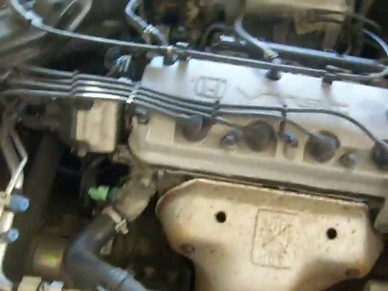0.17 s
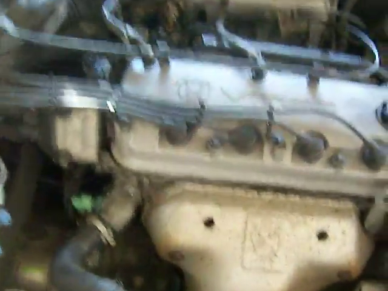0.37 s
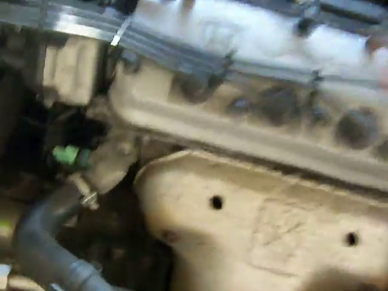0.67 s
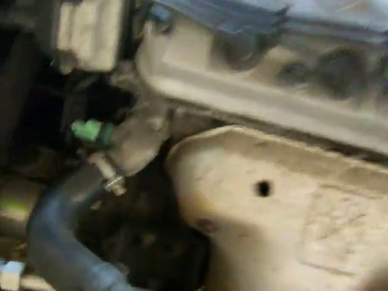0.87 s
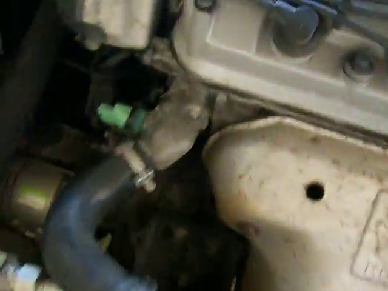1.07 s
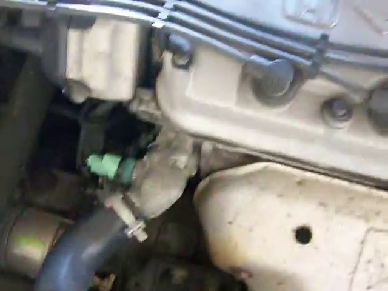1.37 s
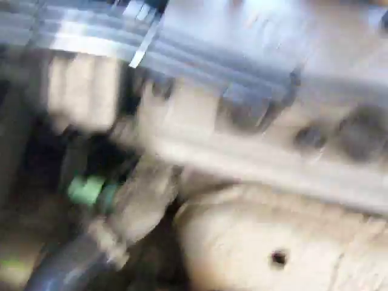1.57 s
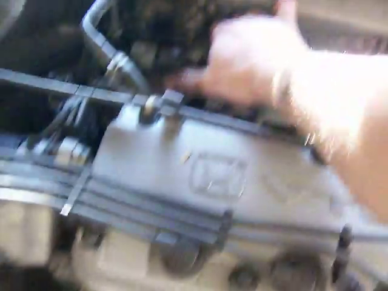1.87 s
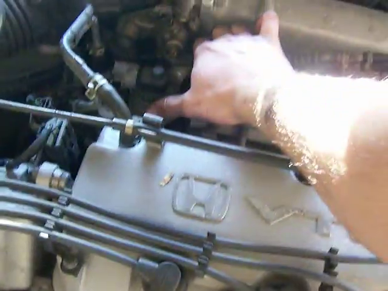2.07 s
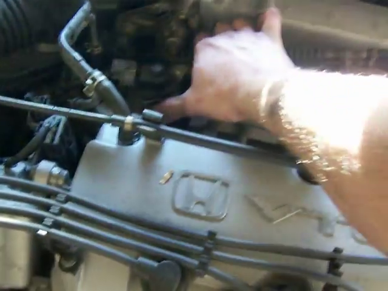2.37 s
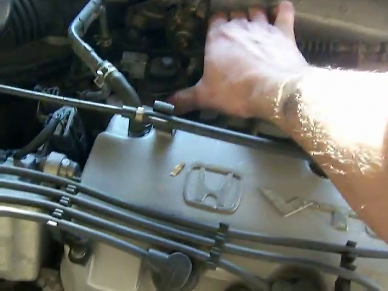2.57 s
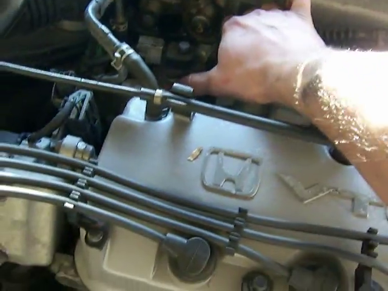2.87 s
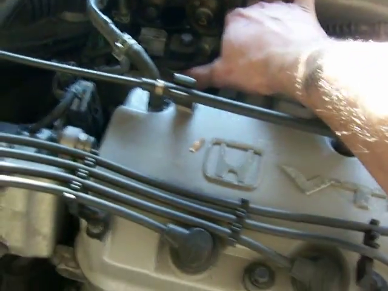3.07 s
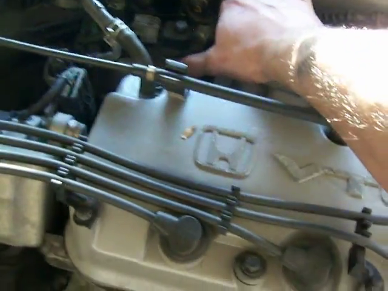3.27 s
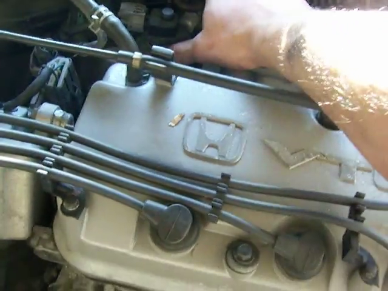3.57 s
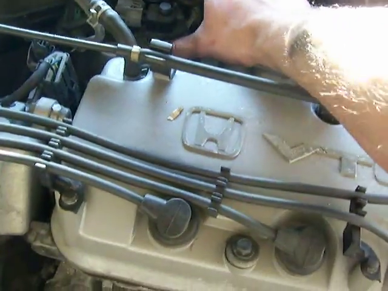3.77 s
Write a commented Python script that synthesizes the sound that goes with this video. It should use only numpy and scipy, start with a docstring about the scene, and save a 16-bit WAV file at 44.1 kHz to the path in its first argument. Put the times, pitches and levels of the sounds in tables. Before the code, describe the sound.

A car engine runs at a fast, steady idle, heard close over the open bay: a low throbbing drone, airy belt hiss, a faint wavering whine and metallic valve ticks about twelve a second. Around 2.6 s the throttle is blipped with a short growl; pitch climbs until about 2.9 s, then sinks, thinner and quieter with separate soft thumps, until a second blip begins near 3.85 s. Dull, limited treble.

```python
"""Fast-idling engine with throttle blips

A four-cylinder engine is heard close over the open bay. A hand blips the throttle: the revs rise and
sink back, and a second blip begins. Firings ring resonances of the intake and exhaust, over steady tones.
Clicks ring the valve gear, filtered noise makes belts, air, panels and roar, and an accessory whines."""
import sys
import numpy as np
from scipy import signal
from scipy.io import wavfile
from scipy.ndimage import uniform_filter1d

SR = 44100
rng = np.random.default_rng(int(sys.argv[2]) if len(sys.argv) > 2 else 0)


def int16_out(signal):
    """Quantize to a 16-bit WAV file."""
    q = np.round(np.clip(np.atleast_2d(signal).T, -1, 1) * 32767)
    wavfile.write(sys.argv[1], SR, q.astype(np.int16))


def voltage_ratio(level):
    """Linear amplitude factor for a level in decibels (scalar or array-like)."""
    return 10 ** (np.asarray(level, float) / 20)


N = 172431

# How strongly each exhaust part sounds: t/s, then level/dB of the unevenly fed low pipes,
# the evenly fed pipe, the firing tone, the upper pipes, and the beat once a crank turn
LOAD_LEVELS = [(0, -19.5, -23, -23, -28, -49), (.5, -21.5, -25.5, -24, -31, -55),
               (1, -19.5, -26, -25.5, -33, -45.5), (2.4, -19.5, -24.5, -25.5, -32, -51.5),
               (2.58, -17, -23.5, -26, -32.5, -39), (2.65, -15, -19, -33, -31, -44),
               (2.73, -26, -27, -26, -30, -23), (2.78, -32, -40, -33, -32.5, -35.5),
               (2.84, -31, -26, -27, -33, -40), (2.95, -36, -24, -30, -40.5, -38),
               (3.07, -38, -34, -26, -44, -40), (3.18, -43, -34.5, -34.5, -51, -47),
               (3.36, -37, -52, -29.5, -44, -35), (3.46, -37, -28, -29.5, -48, -31.5),
               (3.62, -52, -43, -32, -51, -29), (3.72, -45, -47, -35, -53, -41),
               (3.83, -19.5, -34.5, -36, -38.5, -41), (3.9, -18.5, -32, -25, -32.5, -25)]
# Noise of the engine bay: t/s, hiss level/dB (trimmed in bay_noise), intake roar level/dB
BAY_LEVELS = [(0, -30.5, -44.5), (1.87, -32.5, -46), (2.45, -31, -44.5), (2.6, -34, -42.5),
              (2.66, -38.5, -37.5), (2.72, -41, -48), (2.8, -38.5, -34), (2.9, -37.5, -46),
              (3.18, -37, -47), (3.5, -39, -51), (3.82, -40.5, -54), (3.9, -39, -35.5)]


def curve(table, col=1):
    """Join one table column by straight lines in time."""
    a = np.array(table, float)
    return np.interp(np.arange(N) / SR, a[:, 0], a[:, col])


def unit(x):
    """Scale to an rms of 1."""
    return x / np.sqrt(np.mean(x ** 2))


def band(x, hz, width):
    """Ring a two-pole resonance with a gain of 1 at its centre."""
    return signal.lfilter(*signal.iirpeak(min(hz, .45 * SR), hz / width, fs=SR), x)


def noise_band(hz, width):
    """Make noise at rms 1, narrowed by two passes through a resonance."""
    noise = rng.standard_normal(N)
    return unit(band(band(noise, hz, width), hz, width))


def walk(rate):
    """Wander at random: levels held for 1 / rate seconds, then smoothed twice."""
    hold = int(SR / rate)
    steps = np.repeat(rng.standard_normal(N // hold + 1), hold)
    return 1.12 * uniform_filter1d(uniform_filter1d(steps, hold), hold)[:N]


def strokes(cycle, sizes, scatter_db):
    """Give one click each quarter cycle, sized by cylinder and by chance."""
    quarter = np.floor(4 * cycle).astype(int)
    at = np.flatnonzero(np.diff(quarter)) + 1
    chance = voltage_ratio(scatter_db * rng.standard_normal(400)[:len(at)])
    out = np.zeros(N)
    out[at] = np.asarray(sizes)[quarter[at] % 4] * chance
    return out


def rumble():
    """Low noise around 63 Hz that follows the level of the firing tone."""
    return voltage_ratio(-21 + curve(LOAD_LEVELS, col=3)) * noise_band(63, 87)


def intake_roar():
    """Noise around 357 Hz that swells and fades."""
    return voltage_ratio(curve(BAY_LEVELS, col=2)) * noise_band(357, 330)


def air_hiss():
    """Air and belt noise in third-octave bands, each flickering by itself."""
    # Shape of the hiss, before scaling to rms 1: f/Hz, level/dB per Hz
    spectrum = [(150, -5), (187, -35.5), (245, -12.5), (316, -34), (602, -22.5), (667, -16.5), (764, -20),
                (831, -18), (1170, -25), (2220, -21.5), (7040, -28), (8630, -28), (11200, -81)]
    # Change of the bands above 4 kHz: t/s, level/dB
    treble = [(0, 1), (2.5, 1), (3.2, -2.5), (3.6, -1), (3.9, 0.5)]
    flicker_db = 1.5
    points = np.array(spectrum)
    out = 0
    for hz in 150 * 2 ** np.arange(0, 5.95, 1 / 3):
        density_db = np.interp(np.log(hz), np.log(points[:, 0]), points[:, 1])
        # A wider band gathers more power
        db = density_db + 10 * np.log10(hz) + flicker_db * walk(11) + (hz > 4000) * curve(treble)
        out = out + voltage_ratio(db) * noise_band(hz, hz / 3)
    return unit(out)


def panels():
    """Cover and heat shield ring: noise through one resonance for each mode."""
    # Ringing modes: f/Hz, width/Hz, level/dB against the hiss
    modes = [(448.2, 12, -14), (866, 87, -11), (1014, 66, -12), (2238, 60, -14.5), (568.4, 14, -19),
             (1339, 59, -12.5), (1569, 31, -15), (1798, 83, -15), (3036, 370, -12.5), (1690, 30, -19.5),
             (3637, 60, -25.5)]
    # As the listening spot moves over the bay: t/s, then level change/dB of the first four modes
    viewpoint = [(.6, -2, -3, -1.5, 3), (1.0, -3, 3.5, -0.5, 2), (1.7, -2.5, -1, 1, -3),
                 (2.1, 4, -1.5, -1, 3), (3.1, -1, -5, 3.5, -8.5)]
    changes = [curve(viewpoint, col=k) for k in range(1, 5)] + [0] * len(modes)
    out = 0
    for (hz, width, db), moved in zip(modes, changes):
        ring = unit(band(rng.standard_normal(N), hz, width))
        out = out + voltage_ratio(db + moved + 1.2 * walk(3.37)) * ring
    return out


def bay_noise(cycle):
    """Hiss and panels pulse together, twice a cycle."""
    pulse = 1 + .033 * np.cos(4 * np.pi * (cycle - .05))
    trim_db = -1.01
    return voltage_ratio(curve(BAY_LEVELS) + trim_db) * pulse * (air_hiss() + panels())


def whine():
    """An accessory's wavering sine tone, with a breathy skirt of noise around it."""
    # Loudness: t/s, level/dB
    levels = [(0, -35), (.15, -35.5), (.28, -36), (.4, -32), (.68, -32), (.78, -38.5), (1.05, -36.5),
              (1.3, -44.5), (1.6, -46.5), (1.88, -40.5), (2.0, -33), (2.5, -36), (2.56, -38.5),
              (2.66, -56.5), (2.72, -60)]
    # Pitch: t/s, f/Hz
    pitch = [(0, 668.8), (.7, 669), (1.2, 671.2), (1.9, 672.7), (2.5, 674.6), (2.7, 680)]
    t = np.arange(N) / SR
    phase = 2 * np.pi * np.cumsum(curve(pitch) * (1 + .00399 * walk(25))) / SR
    tone = np.sqrt(2) * np.sin(phase)
    skirt = voltage_ratio(-8) * unit(band(rng.standard_normal(N), pitch[2][1], 33))
    fade = np.clip((2.8 - t) / .1, 0, 1)  # silent from 2.8 s
    return fade * voltage_ratio(curve(levels) + .8 * walk(15)) * (tone + skirt)


def tappet(hits):
    """Each hit is a click and a short rattle into the modes of the valve gear, weighted anew."""
    # Valve gear modes: f/Hz, level/dB, time to fall by 60 dB/s
    gear_modes = [(2090, -8.5, 0.0075), (2253, -4, 0.035), (2600, -2.5, 0.016), (2866, 0, 0.014),
                  (3110, 0.5, 0.016), (3460, -10, 0.011), (4080, -8.5, .008), (4920, -4.5, 0.0079),
                  (5460, -4.5, 0.0062), (6400, -5, 0.0046), (7030, -5, 0.0065)]
    rattle_s, mode_scatter_db = .0085, 2.5
    t = np.arange(int(.05 * SR)) / SR
    hz, db, t60 = np.array(gear_modes).T[:, :, None]
    rings = np.sin(2 * np.pi * hz * t) * 1000 ** (-t / t60)
    out = np.zeros(N + 2 * len(t))
    for start_s, level_db, tilt in hits:
        octaves = np.log2(np.minimum(hz, 5000) / 2600)
        chance_db = mode_scatter_db * rng.standard_normal((len(hz), 1))
        gains = voltage_ratio(db + tilt * octaves + chance_db)
        rattle = np.exp(-t / rattle_s) * rng.standard_normal(len(t))
        click = 3.7 * (t == 0)
        y = signal.fftconvolve(rattle + click, np.sum(gains * rings, axis=0))
        i = int(start_s * SR)
        # The level sets the energy of the hit, counted over 14 ms
        out[i:i + len(y)] += voltage_ratio(level_db) * y / np.sqrt(np.sum(y ** 2) / (.014 * SR))
    return out[:N]


def valve_gear(cycle):
    """A loud tick once a cycle, fainter as the revs sink, and a smaller one about half a cycle later."""
    # Loud ticks up to the top of the blip: t/s, level/dB before the final cut, brightness/dB per octave
    loud = [(0.0769, -30, -4), (0.168, -20.5, 1.5), (0.2546, -19, -4), (0.342, -20.5, 3),
            (0.4309, -26, 5.5), (0.5145, -22, -0.5), (0.6034, -23.5, -4), (0.6894, -22, -10),
            (0.7701, -28, -7.5), (0.8533, -22.5, -2), (0.9429, -25, 3), (1.0275, -22, -3), (1.1138, -23, 4),
            (1.1988, -22, -3), (1.285, -25, -2.5), (1.3713, -22.5, 1.5), (1.4592, -27, 1.5),
            (1.5444, -24.5, -11), (1.6322, -22, -1), (1.719, -26, 0.5), (1.8038, -24.5, 3.5),
            (1.8896, -26, -0.5), (1.9724, -24.5, 4), (2.0636, -25, -2), (2.146, -26, 0.5),
            (2.2317, -23, -1), (2.3202, -26.5, -8), (2.4034, -27.5, -2), (2.496, -19, -1),
            (2.584, -17.5, -0.5), (2.6657, -23.5, 7), (2.7413, -21.5, 3), (2.801, -20.5, 6),
            (2.8602, -29, 2.5)]
    # Faint ticks while the revs sink: t/s, level/dB before the final cut
    coast_levels = [(2.87, -35.5), (3.3, -31), (3.64, -35), (3.67, -26), (3.8, -39.5), (3.9, -21)]
    scatter_db = 1.0

    def rows(clicks, db):
        """Turn clicks into hits of even brightness."""
        return [(i / SR, db[i] + 20 * np.log10(clicks[i]), 0) for i in np.flatnonzero(clicks)]

    small = strokes(cycle - .04, [0, 0, 1, 0], scatter_db)
    coasting = np.arange(N) > coast_levels[0][0] * SR
    coast = strokes(cycle, [1, 0, 0, 0], scatter_db) * coasting
    hits = loud + rows(coast, curve(coast_levels)) + rows(small, curve(BAY_LEVELS) + 3)
    return voltage_ratio(-8) * tappet(hits)


def lone_firings():
    """Single firings that stand out as the blips begin and as the revs sink: short rings of one pipe."""
    # The firings: t/s, peak level/dB
    firings = [(2.643, -12.5), (3.047, -16), (3.103, -14), (3.158, -16), (3.271, -22), (3.338, -27),
               (3.401, -18), (3.466, -27), (3.882, -13.5)]
    # The pipe they ring: f/Hz, width of each of two passes/Hz
    lone_pipe = (114, 42)
    x = np.zeros(N)
    for start_s, db in firings:
        x[int(start_s * SR)] = voltage_ratio(db)
    ring = band(band(signal.unit_impulse(SR // 5), *lone_pipe), *lone_pipe)
    return signal.fftconvolve(x, -ring / np.abs(ring).max())[:N]


def pipes(cycle, table):
    """Each pipe hears the four cylinders at its own strengths, equal or not, and rings steeply."""
    out = 0
    for hz, width, db, lag, second, third, fourth in table:
        x = strokes(cycle - lag, [1, second, third, fourth], .4)
        for _ in range(3):
            x = band(x, hz, 2 * width)
        out = out + voltage_ratio(db) * unit(x)
    return unit(out)


def firing_tone(cycle):
    """A cosine at the firing rate, with wavering ones at a half and three quarters of it."""
    half = voltage_ratio(-12.5 + 1.5 * walk(5)) * np.cos(4 * np.pi * cycle)
    three_quarters = voltage_ratio(-16 + 2.5 * walk(5)) * np.cos(6 * np.pi * (cycle - .03))
    return unit(np.cos(8 * np.pi * (cycle - .02)) + half - three_quarters)


def exhaust(cycle):
    """Firings ring the intake and exhaust pipes, beside the firing tone and its octave."""
    # The four pipe tables share their columns: f/Hz, width/Hz (doubled in pipes), level/dB within
    # the table, lag/cycles, then strength of cylinders 2, 3 and 4 against the first
    # Low pipes fed unevenly
    uneven_pipes = [(106.4, 15.2, 0, .285, .17, .8, 1), (95, 20, -3.3, .196, 0, 0, .69)]
    # Low pipe fed evenly
    even_pipe = [(139, 10, 0, .133, 1, 1, 1)]
    # Upper pipes
    upper_pipes = [(218.1, 17.6, -7.5, 0.3083, 0, 0.68, 0.44), (231.7, 21.3, -2, 0.2985, 0.98, 0.97, 1),
                   (261.6, 8.4, -12.5, 0.47, 0.53, 1, 0.09), (272.3, 43, -18.5, 0.2988, 0, 1, 1)]
    # Pipes of the beat once a crank turn
    crank_pipes = [(86, 46, -2, 0.09, 0, 1, 0), (127.2, 13, 0, 0.093, 0.013, 0.45, 0)]
    # Octave above the firing tone, heard off idle: t/s, level/dB
    octave_levels = [(2.55, -55), (2.63, -20), (2.72, -35), (2.79, -37), (2.86, -48), (3.0, -49),
                     (3.45, -42), (3.55, -28), (3.66, -32), (3.75, -31), (3.85, -41), (3.91, -23)]
    out = voltage_ratio(curve(LOAD_LEVELS)) * pipes(cycle, uneven_pipes)
    out = out + voltage_ratio(curve(LOAD_LEVELS, col=2)) * pipes(cycle, even_pipe)
    out = out + voltage_ratio(curve(LOAD_LEVELS, col=3)) * firing_tone(cycle)
    out = out + voltage_ratio(curve(LOAD_LEVELS, col=4)) * pipes(cycle, upper_pipes)
    out = out + voltage_ratio(curve(LOAD_LEVELS, col=5)) * pipes(cycle, crank_pipes)
    octave = np.sqrt(2) * np.cos(16 * np.pi * (cycle - .01))
    return out + voltage_ratio(curve(octave_levels)) * octave + lone_firings()


def scene():
    """Add all sources; those that follow the engine share its four-stroke cycle."""
    # Engine speed: t/s, firing rate/Hz
    speed = [(0, 46.0), (.5, 46.6), (1.3, 46.4), (2.2, 46.3), (2.45, 46.3), (2.53, 46.3), (2.61, 45.5),
             (2.66, 49), (2.72, 55.5), (2.85, 76.6), (2.92, 77.8), (3.0, 75.4), (3.3, 64.3), (3.55, 53.8),
             (3.7, 50), (3.82, 45.8), (3.91, 48)]
    first_tick_s = .0815
    cycle = np.cumsum(curve(speed)) / (4 * SR)  # four firings a cycle
    cycle = 2 + cycle - cycle[int(first_tick_s * SR)]  # a whole number at this moment
    background = rumble() + intake_roar() + bay_noise(cycle) + whine()
    return (background + valve_gear(cycle) + exhaust(cycle))[None]


def roll_off(x):
    """The treble ends steeply here."""
    return signal.sosfilt(signal.butter(12, 8950, fs=SR, output="sos"), x)


def record(dry):
    """Cut the top of the treble, above 7290 Hz, with a steep low-pass."""
    mix = signal.sosfilt(signal.butter(7, 7290, fs=SR, output="sos"), dry)
    return roll_off(mix)


dry = scene()
out = record(dry)
int16_out(out)
```